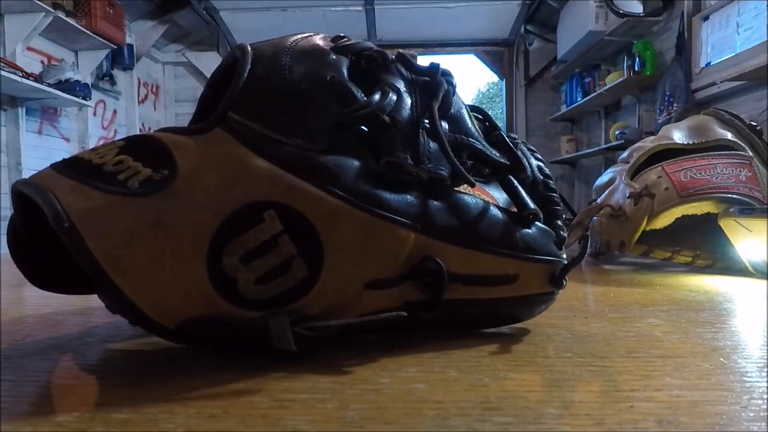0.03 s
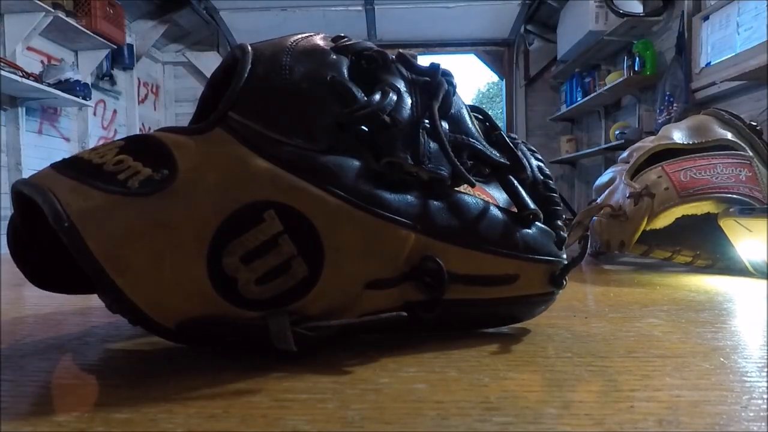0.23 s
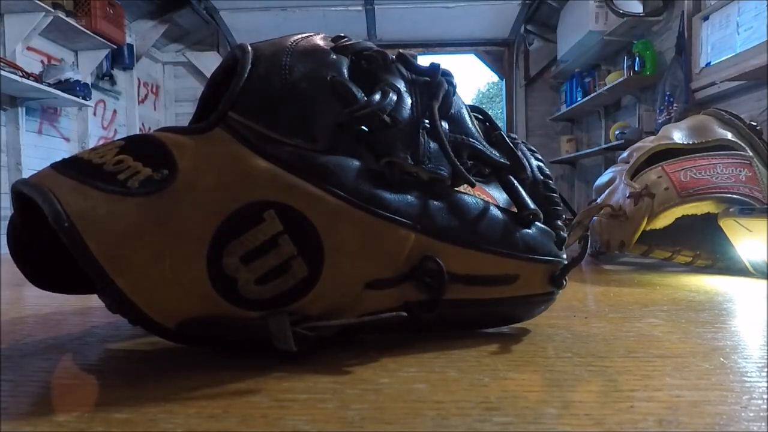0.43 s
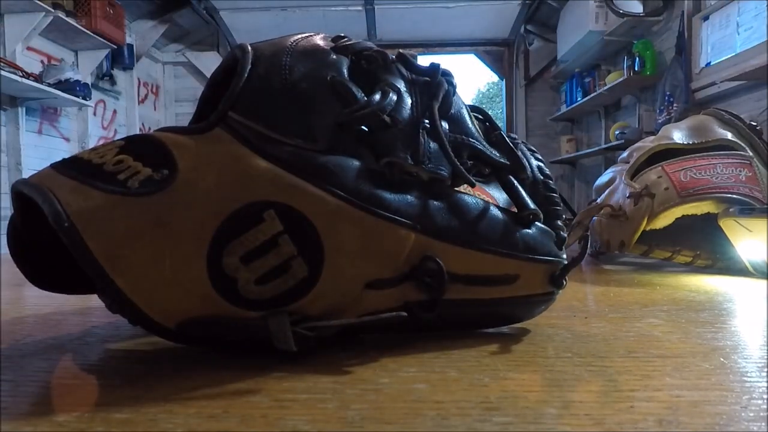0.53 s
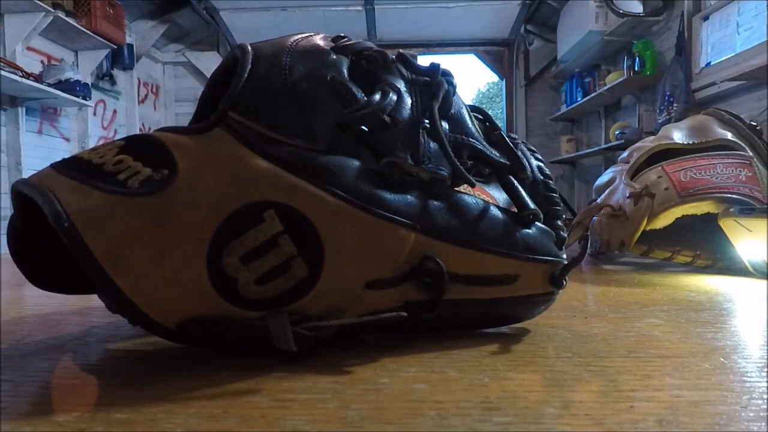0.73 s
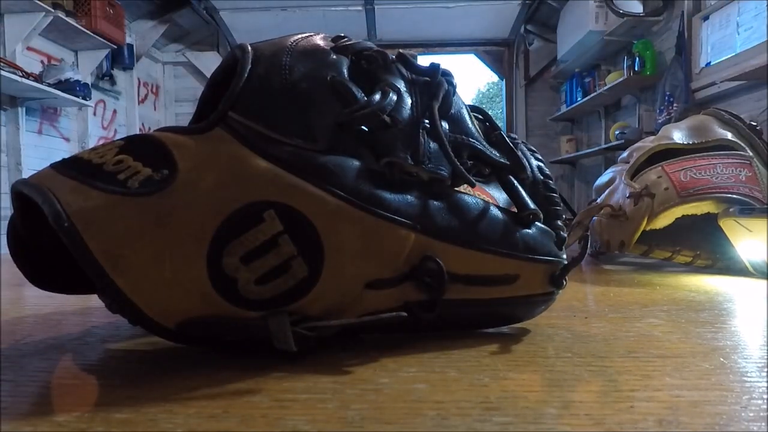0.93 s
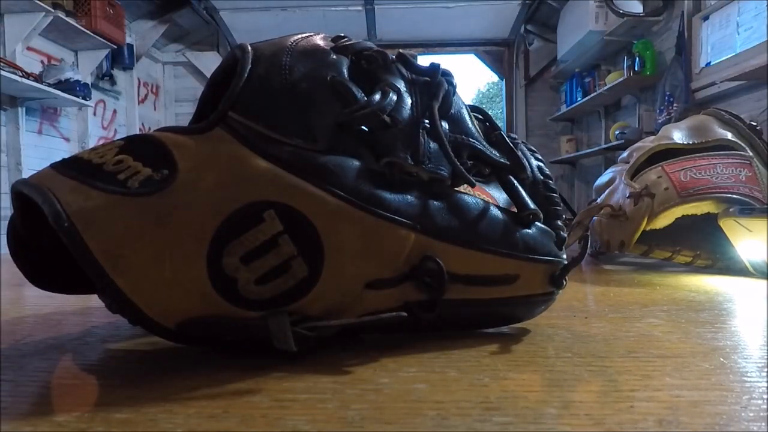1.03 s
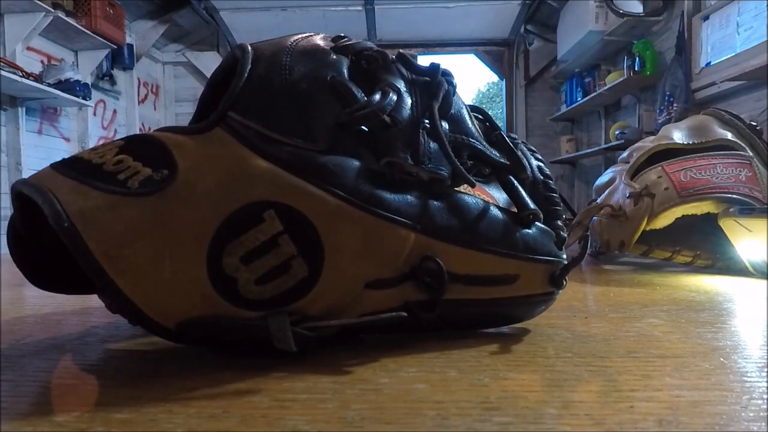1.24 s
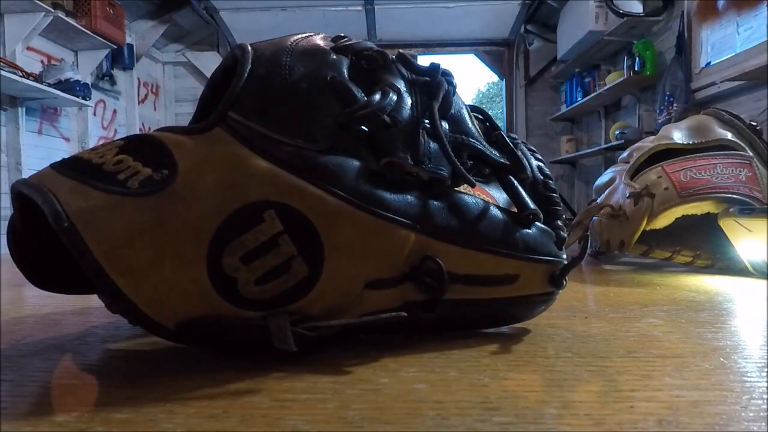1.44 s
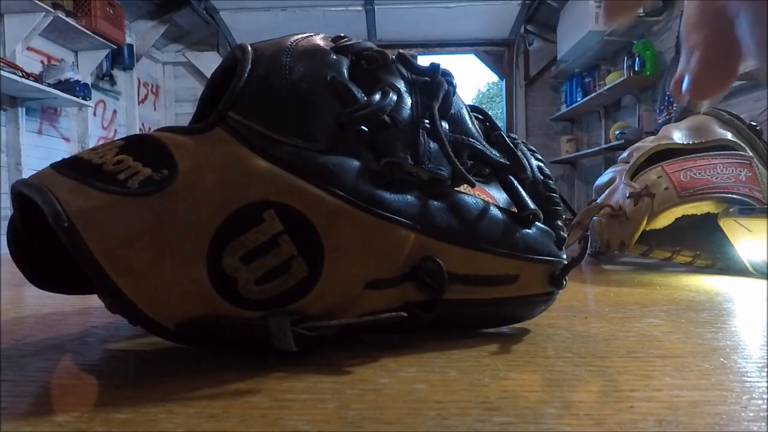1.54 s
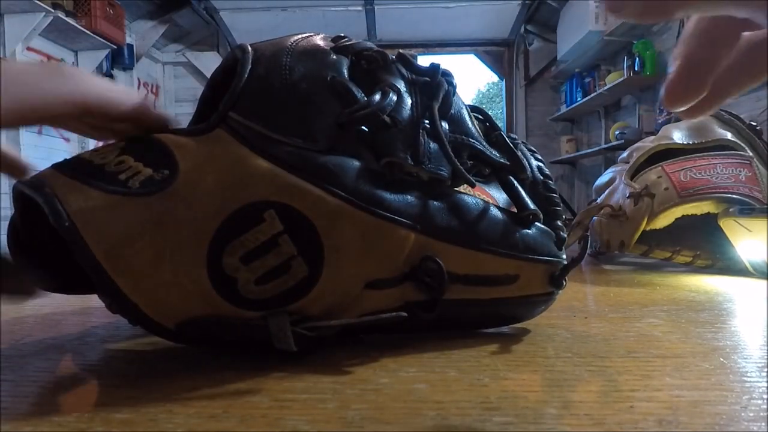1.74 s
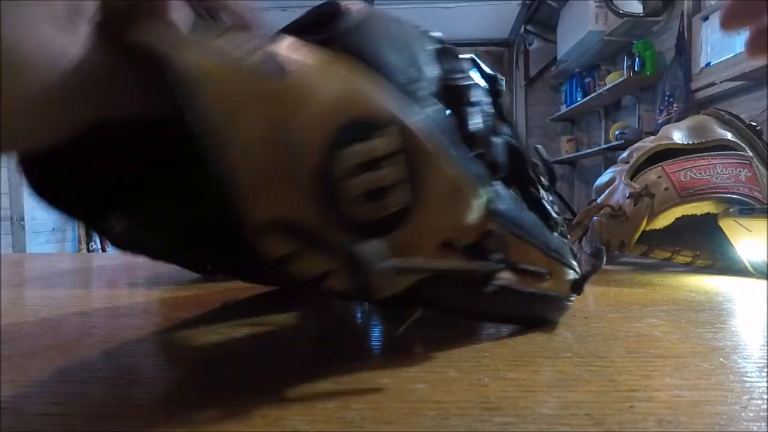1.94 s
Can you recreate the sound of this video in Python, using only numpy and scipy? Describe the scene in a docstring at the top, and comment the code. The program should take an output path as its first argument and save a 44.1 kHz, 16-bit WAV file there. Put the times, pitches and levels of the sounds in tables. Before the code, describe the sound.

A leather baseball glove shifts on a wooden table with low muffled knocks, small ticks and faint rustles follow, then it drops with one loud, slapping thud; close stereo microphones in a quiet, humming garage.

```python
"""A leather glove is shifted and then dropped on a wooden tabletop in a garage, over a steady hum.
First (0.1 to 0.3 s) the glove shifts: light knocks and rubbing ring the table's low modes, with dull leather slaps.
Then small ticks and soft rustles of filtered noise follow until the glove drops at about 1.46 s with hard knocks and
slaps; a limiter ducks the level and narrows the stereo width. Last, from 1.8 s, come a few faint contacts and ticks.
The table's modes reach the two microphones unequally and out of step; a short dull room tail follows near sounds."""
import sys
import numpy as np
from scipy import signal
from scipy.fft import rfft, irfft
from scipy.io import wavfile

SR = 44100
rng = np.random.default_rng(int(sys.argv[2]) if len(sys.argv) > 2 else 0)


def amplitude_ratio(level_db):
    """Convert a level in decibels to the matching linear amplitude (field) ratio."""
    exponent = np.asarray(level_db, float) / 20
    return 10 ** exponent


def wav_out(sig):
    """Save sig, one row per channel (or a flat mono array), as 16-bit PCM at SR to the path in sys.argv[1]."""
    wavfile.write(sys.argv[1], SR, np.round(np.clip(np.atleast_2d(sig).T, -1, 1) * 32767).astype(np.int16))


N = 88200  # length in samples: 2 s

# Tone colour of the garage air: (pitch [Hz], relative level [dB])
HUM_COLOUR = [(13, -38), (22, -16), (102, -10), (154, -4.5), (341, -6.5), (391, -15), (500, -6.5),
              (2020, -17.5), (4730, -29.5), (5420, -26), (9910, -27.5), (12300, -34.5), (15400, -42)]
# How alike the hum is left and right: (pitch [Hz], likeness [-1 opposite to 1 same])
HUM_LIKENESS = [(60, 1), (130, .4), (380, -.1), (640, -0.48), (1400, -0.5), (2400, -0.26), (4200, 0.9),
                (6800, 0.1), (14000, 0.16)]
# Steady narrow drones in the hum: (pitch [Hz], width [Hz], level [dB])
DRONES = [(155.6, 4.7, -67.5), (5330, 300, -73)]
HUM_DB = -51
TONE_HZ, TONE_DB = 386.4, -58  # one thin steady tone

# Soft rustles, likely cloth: (centre time [s], length [s], level [dB], centre pitch [Hz])
RUSTLES = [(0.583, 0.092, -61, 5700), (0.827, 0.1, -56.5, 6020), (1.051, 0.047, -52, 5740),
           (1.119, 0.041, -54, 5560), (1.342, 0.031, -60, 5300), (1.403, 0.13, -63.5, 2620)]
RUSTLE_OCTAVES, RUSTLE_LIKENESS = 1.38, 0.017  # band width, left-right likeness

# Table legs rocking: (pitch [Hz], level [dB], time to fall 60 dB [s])
LEG_MODES = [(34.55, -10, 1.43), (68.1, -0.5, 0.35), (118, -12, 0.24)]
# Shoves that rock the legs: (time [s], strength [dB])
SHOVES = [(0.018, -45), (0.102, -36.5), (0.202, -25.5), (0.269, -27.5), (1.469, -47), (1.56, -38.5),
          (1.851, -49.5)]

# Sharp ticks of lace and leather:
# (time [s], starting level [dB], centre pitch [Hz], time to fall 60 dB [s], left over right [dB])
TICKS = [(0.196, -46, 3420, 0.015, 2.5), (0.253, -52, 2160, 0.022, 8), (0.39, -52, 6040, 0.018, 2.5),
         (0.553, -46.5, 5200, 0.018, 10), (0.56, -44, 6480, 0.022, 11), (1.465, -14, 2300, 0.026, -0.5),
         (1.466, -29, 5150, 0.011, 9), (1.497, -30.5, 2330, 0.044, 0), (1.604, -43.5, 3120, 0.029, 1),
         (1.775, -51, 1250, 0.17, 4), (1.846, -43.5, 3330, 0.017, 0.5), (1.938, -52.5, 2450, 0.02, 5),
         (1.992, -47.5, 4270, 0.013, 5), (1.993, -53, 7800, .04, 0.5)]
TICK_OCTAVES, TICK_LIKENESS = 0.98, 0.39
# Noisy slaps of the leather itself:
# (time [s], starting level [dB], centre pitch [Hz], time to fall 60 dB [s], left over right [dB])
SLAPS = [(0.113, -40, 600, 0.19, 3), (0.149, -23.5, 560, 0.19, 1), (0.194, -35.5, 825, 0.083, -8.5),
         (0.245, -30.5, 480, .12, 5), (1.4645, 2, 750, 0.0433, -3.5), (1.466, -5.5, 533, 0.24, -1),
         (1.47, -24, 1300, 0.43, 3), (1.495, -35, 1180, .1, -2), (1.822, -43.5, 770, 0.25, 3)]
SLAP_OCTAVES, SLAP_LIKENESS = 0.96, -0.8

# Ringing modes of the tabletop: (pitch [Hz], level [dB], left over right [dB], left leads by [rad])
TABLE_MODES = [(154, 2.5, 5.5, 0.94), (176.7, -2.5, 8, -1.1), (204.6, -4, 4.5, -0.62), (235.2, -3, 10, -1),
               (287, -5, 6, -3.3), (331.1, -5.5, 14, -4.5), (392.5, -5.5, 11, -3.5),
               (449.5, 2.5, 7.5, -3.0), (490, -5, 3.5, -3), (560, 1, 0.65, -3), (618, -2, -0.7, -3),
               (712, -11.5, 14, -1.5), (750, -4, -5, -2), (786, -8, 4, -3), (865, -8.5, 2, -6),
               (939, -3.5, 9, -6), (972.4, -12.5, 19.5, -3.5), (1114, -9.5, 9, -9.5),
               (1181, -14, 13.5, -0.5), (1300, -27, -6.5, 1)]
# Knocks of the glove on the wood: (time [s], strength [dB], pitch struck most [Hz])
CONTACTS = [(0.106, -39, 400), (0.137, -30.5, 500), (0.151, -18.5, 450), (0.161, -25, 600),
            (0.167, -25, 550), (0.193, -17, 220), (0.209, -40, 400), (0.246, -39, 350), (0.258, -32, 450),
            (0.285, -39, 150), (1.455, -41, 647), (1.4644, -3.5, 663), (1.476, -7, 250), (1.487, -6.5, 350),
            (1.497, -5, 350), (1.534, -20.5, 300), (1.573, -19.5, 160), (1.604, -28, 180),
            (1.798, -48.5, 170), (1.821, -39.5, 600), (1.84, -40, 350), (1.860, -44.5, 170),
            (1.908, -54, 400), (1.978, -57, 400)]
# Strength of leather rubbing on the wood: (time [s], strength [dB])
RUB = [(0.0, -66.5), (0.06, -58), (0.11, -44.5), (0.15, -38), (0.27, -51), (0.33, -61), (0.5, -69),
       (1.43, -65.5), (1.46, -35), (1.47, -10.5), (1.51, -26.5), (1.6, -42), (1.7, -63.5), (1.8, -58.5),
       (1.85, -60.5), (2.0, -57.5)]
CONTACT_REACH_OCTAVES = 1.026  # how far from its own pitch a knock still strikes modes
RUB_SLIPS_PER_S, RUB_CUT_HZ = 700, 605  # rubbing drives modes above the cut less and less
T60_AT_200_HZ_S, T60_FALL = 0.21, 0.98  # ring time shrinks as a power of pitch
TABLE_LOW_HZ, TABLE_HIGH_HZ = 135, 1836  # the table's sound is kept between these pitches

ROOM_T60_S, ROOM_DB, ROOM_CUT_HZ = 0.12, -21, 2700

CEILING_DB, LOOK_AHEAD_S, RECOVERS_DB_PER_S = -0.6, 0.001, 35
# Width narrows by this share of the overshoot, more slowly, and hardly widens again
NARROW_SHARE, NARROW_ATTACK_S, WIDENS_DB_PER_S = 0.48, 0.18, 0.5


def curve(points, at):
    """Straight lines between table rows."""
    x, y = np.transpose(points)
    return np.interp(at, x, y)


def rms_one(x):
    """Scale to an rms (average strength) of 1."""
    return x / np.sqrt(np.mean(x ** 2) + 1e-20)


def band(x, hz, octaves):
    """Keep only the pitches around a centre."""
    edges = hz * 2 ** (np.array([-0.5, 0.5]) * octaves)
    edges = np.clip(edges, 10, 0.45 * SR)
    return signal.sosfilt(signal.butter(3, edges, "band", fs=SR, output="sos"), x)


def pair(two, alike):
    """Turn two unrelated noises into left and right of a given likeness."""
    alike = np.clip(alike, -1, 1)
    shared = np.sqrt(1 + alike) * two[0]
    opposed = np.sqrt(1 - alike) * two[1] * [[1], [-1]]
    return (shared + opposed) / np.sqrt(2)


def ring(drive, hz, t60):
    """A mode as a complex dying tone; its imaginary part is a sine of height 1 per unit click."""
    pole = amplitude_ratio(-60 / (t60 * SR)) * np.exp(2j * np.pi * hz / SR)
    return signal.lfilter([1], [1, -pole], drive + 1e-18)


def bursts(rows, octaves, alike):
    """Bursts of band noise that start at once and die away."""
    size = SR // 4
    t = np.arange(size) / SR
    out = np.zeros((2, N + size))
    noise = rng.standard_normal((len(rows), 2, size))
    for two, (s, db, hz, t60, pan_db) in zip(noise, rows):
        dying = two * amplitude_ratio(db - 60 * t / t60)
        # Divide by the strength of the undying band noise, so the level does not depend on the band
        burst = band(dying, hz, octaves) / np.std(band(two, hz, octaves))
        i = int(s * SR)
        out[:, i:i + size] += pair(burst, alike) * amplitude_ratio([[pan_db / 2], [-pan_db / 2]])
    return out[:, :N]


def hum():
    """Steady garage air: noise coloured by pitch, with narrow noise drones and one pure tone."""
    hz = np.maximum(np.fft.rfftfreq(N, 1 / SR), 1)
    log_hz = np.log(hz)
    colour = amplitude_ratio(curve([(np.log(f), db) for f, db in HUM_COLOUR], log_hz))
    alike = curve([(np.log(f), a) for f, a in HUM_LIKENESS], log_hz)
    spectrum = rfft(rng.standard_normal((2, N))) * colour
    out = amplitude_ratio(HUM_DB) * rms_one(irfft(pair(spectrum, alike), N))
    for centre_hz, width_hz, db in DRONES:
        line = 1 / (1 + (2 * (hz - centre_hz) / width_hz) ** 2)
        spectrum = rfft(rng.standard_normal((2, N))) * line
        out = out + amplitude_ratio(db) * rms_one(irfft(pair(spectrum, 0.17), N))
    phase = 2 * np.pi * TONE_HZ * np.arange(N) / SR + rng.uniform(0, 6.4)
    return out + amplitude_ratio(TONE_DB) * np.sin(phase)


def rustles():
    """Grainy bright noise that swells and fades."""
    t = np.arange(N) / SR
    # Slower noise roughens the loudness of the faster noise
    roughness = rms_one(band(rng.standard_normal(N), 100, 2.1))
    grain = rng.standard_normal((2, N)) * amplitude_ratio(1.6 * roughness)
    out = np.zeros((2, N))
    for s, length, db, hz in RUSTLES:
        swell = np.exp(-(2 * (t - s) / length) ** 4)
        noise = rms_one(band(grain, hz, RUSTLE_OCTAVES))
        out += amplitude_ratio(db) * swell * pair(noise, RUSTLE_LIKENESS)
    return out


def legs():
    """Each shove sets the low rocking modes going, alike in both microphones."""
    s, db = np.transpose(SHOVES)
    drive = np.zeros(N)
    drive[(s * SR).astype(int)] = amplitude_ratio(db)
    return sum(amplitude_ratio(level_db) * np.imag(ring(drive, hz, t60)) for hz, level_db, t60 in LEG_MODES)


def ticks():
    """Lace and leather tick: short bursts of mostly bright noise."""
    return bursts(TICKS, TICK_OCTAVES, TICK_LIKENESS)


def slaps():
    """The leather slaps: duller noise bursts, largely opposite in left and right."""
    return bursts(SLAPS, SLAP_OCTAVES, SLAP_LIKENESS)


def rubbing_slips():
    """Leather rubbing on wood as many tiny slips at random moments."""
    slipping = rng.random(N) < RUB_SLIPS_PER_S / SR
    return slipping * amplitude_ratio(curve(RUB, np.arange(N) / SR))


def table():
    """Knocks and slips strike every mode; a knock strikes most those near its own pitch."""
    s, db, struck_hz = np.transpose(CONTACTS)
    slips = rubbing_slips()
    out = np.zeros((2, N))
    for hz, mode_db, pan_db, lead in TABLE_MODES:
        drive = slips * rng.standard_normal(N) / (1 + (hz / RUB_CUT_HZ) ** 2)
        octaves_away = np.log2(hz / struck_hz)
        reach = np.exp(-0.5 * (octaves_away / CONTACT_REACH_OCTAVES) ** 2)
        np.add.at(drive, (s * SR).astype(int), amplitude_ratio(db) * reach)
        t60 = T60_AT_200_HZ_S * (200 / hz) ** T60_FALL
        tone = amplitude_ratio(mode_db) * ring(drive, hz, t60)
        out[0] += amplitude_ratio(pan_db / 2) * np.imag(tone * np.exp(1j * lead))
        out[1] += amplitude_ratio(-pan_db / 2) * np.imag(tone)
    wood = signal.butter(4, [TABLE_LOW_HZ, TABLE_HIGH_HZ], "band", fs=SR, output="sos")
    return signal.sosfilt(wood, out)


def garage(x):
    """The room's answer: a dull tail of dying noise, different at each microphone."""
    t = np.arange(SR // 2) / SR
    # The tail starts 6 ms late
    tail = rng.standard_normal((2, len(t))) * amplitude_ratio(-60 * t / ROOM_T60_S) * (t > 0.006)
    tail = signal.sosfilt(signal.butter(1, ROOM_CUT_HZ, fs=SR, output="sos"), tail)
    tail = tail / np.sqrt(np.sum(tail ** 2, axis=1, keepdims=True))
    return amplitude_ratio(ROOM_DB) * signal.fftconvolve(x, tail, axes=1)[:, :N]


def scene():
    """Glove, table and garage; only the near sounds wake the room tail."""
    near = table() + ticks() + slaps()
    return near + garage(near) + legs() + rustles() + hum()


def duck(over_db, recover_db_per_s, attack_s):
    """Gain that drops by the overshoot and climbs back at a steady rate in dB."""
    ramp = recover_db_per_s * np.arange(N) / SR
    cut_db = np.maximum.accumulate(over_db + ramp) - ramp
    r = np.exp(-1 / (attack_s * SR))
    smooth_cut_db = signal.lfilter([1 - r], [1, -r], np.maximum(cut_db, 0))
    return amplitude_ratio(-smooth_cut_db)


def low_pass(x):
    """Removes everything above the highest recorded frequency."""
    return signal.sosfilt(signal.butter(12, 15510, fs=SR, output="sos"), x)


def record(dry):
    """A limiter looks slightly ahead and turns loud peaks down; the same overshoot narrows the width."""
    ahead = int(LOOK_AHEAD_S * SR)
    peak = np.append(np.abs(dry).max(axis=0)[ahead:], np.zeros(ahead))
    over_db = np.maximum(20 * np.log10(peak + 1e-9) - CEILING_DB, 0)
    mid = (dry[0] + dry[1]) / 2
    side = (dry[0] - dry[1]) / 2
    side = side * duck(NARROW_SHARE * over_db, WIDENS_DB_PER_S, NARROW_ATTACK_S)
    gain = duck(over_db, RECOVERS_DB_PER_S, LOOK_AHEAD_S / 2)
    mix = np.array([mid + side, mid - side]) * gain
    return low_pass(mix)


dry = scene()
out = record(dry)
wav_out(out)
```